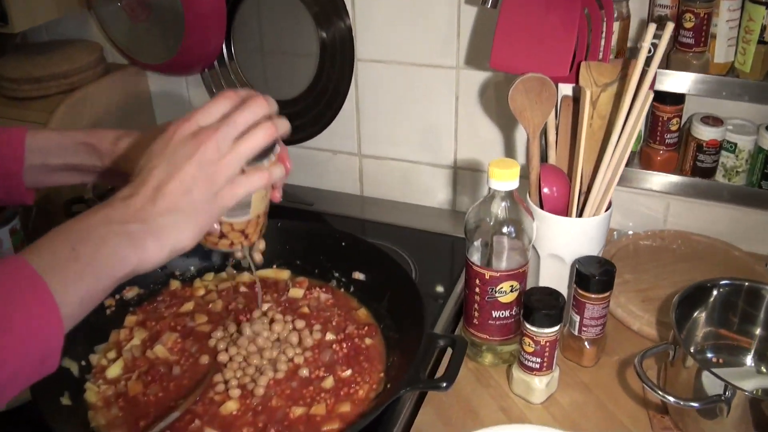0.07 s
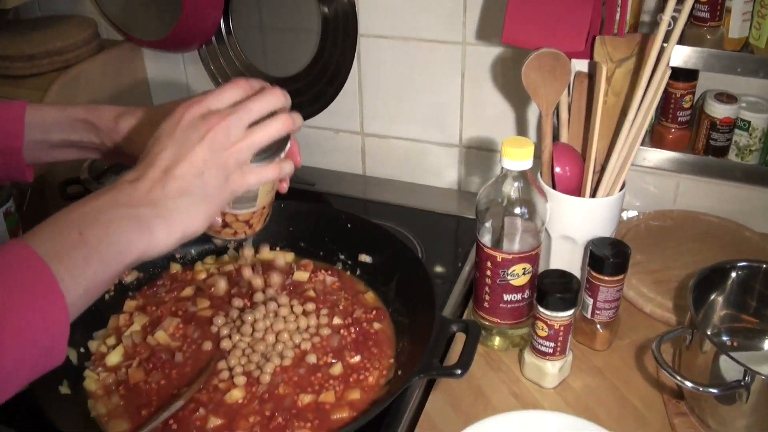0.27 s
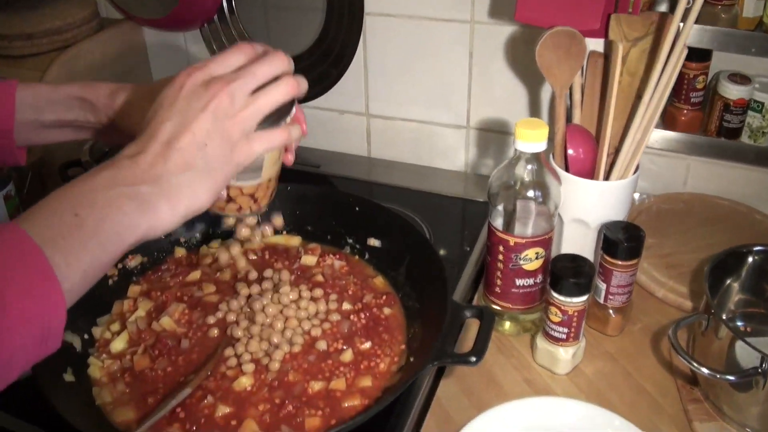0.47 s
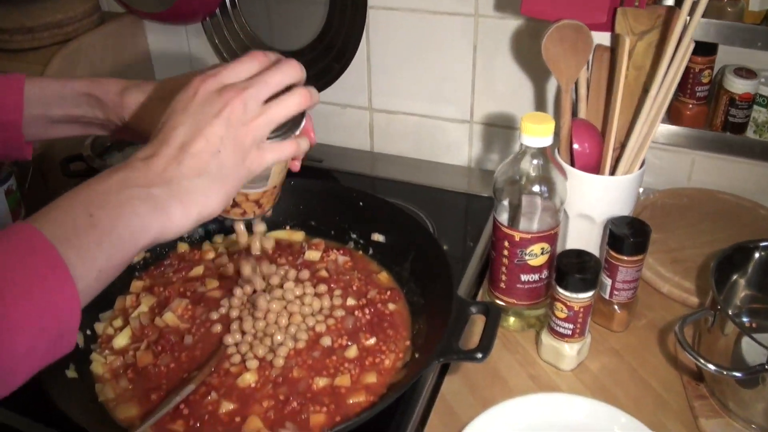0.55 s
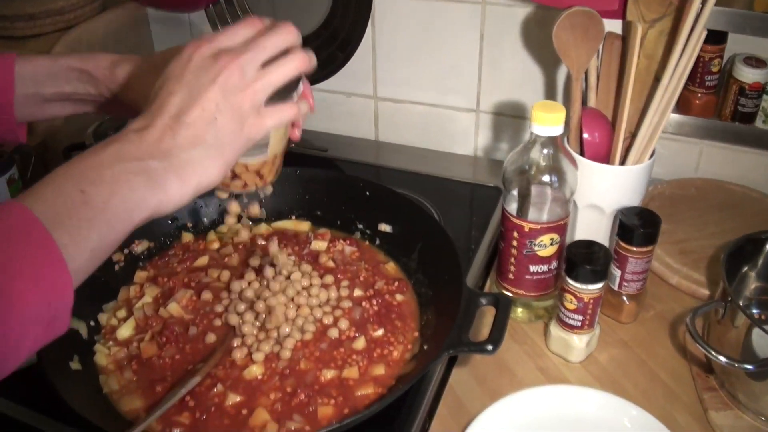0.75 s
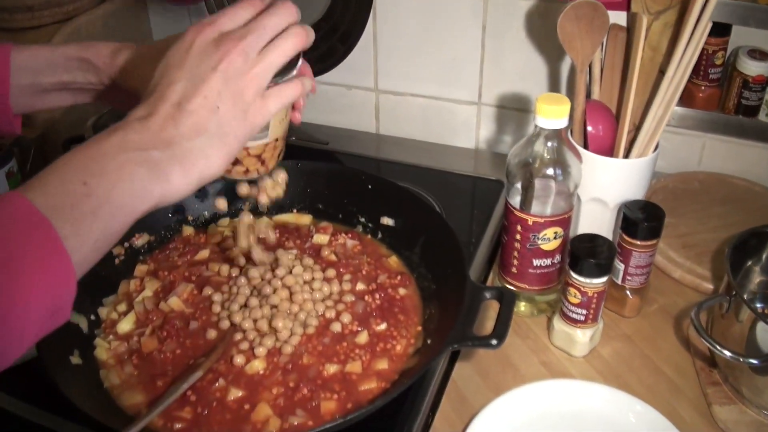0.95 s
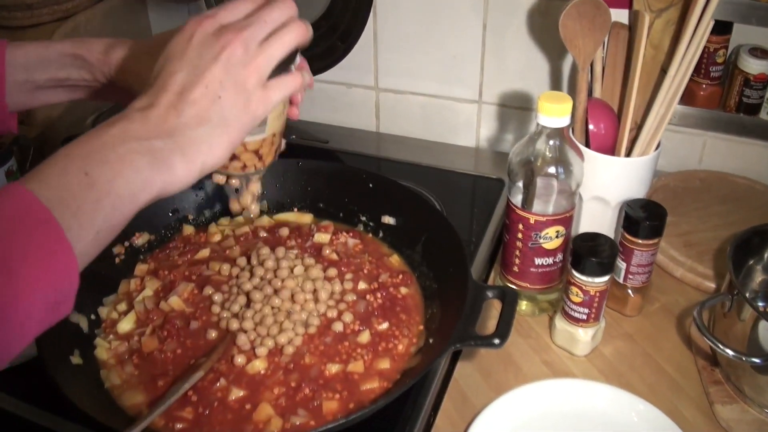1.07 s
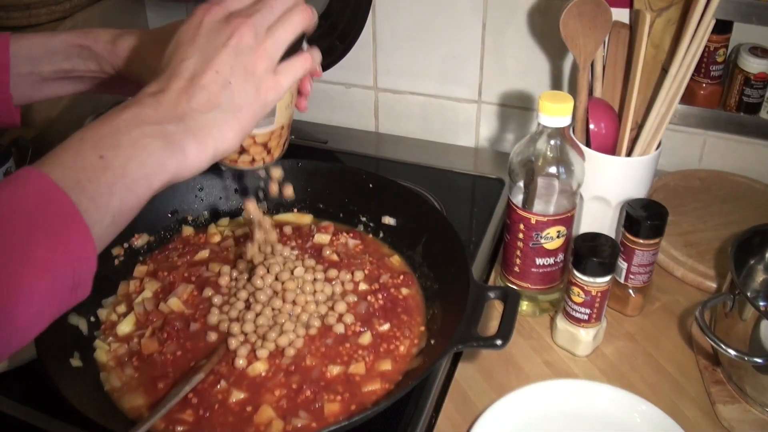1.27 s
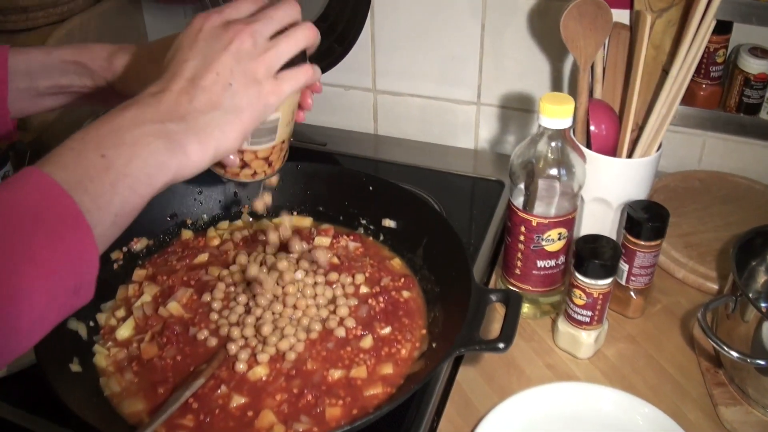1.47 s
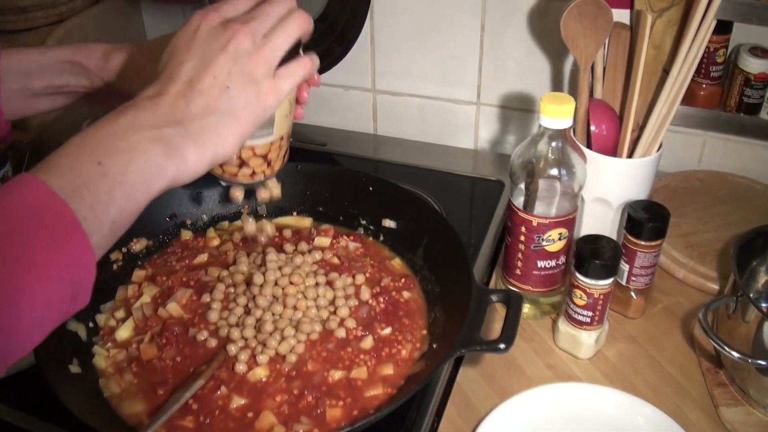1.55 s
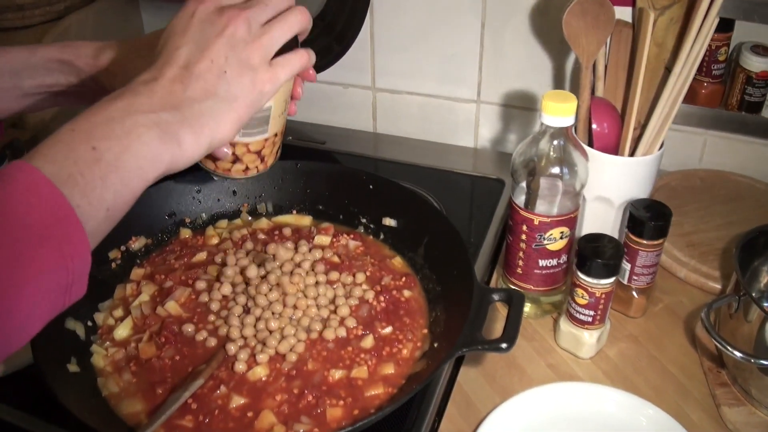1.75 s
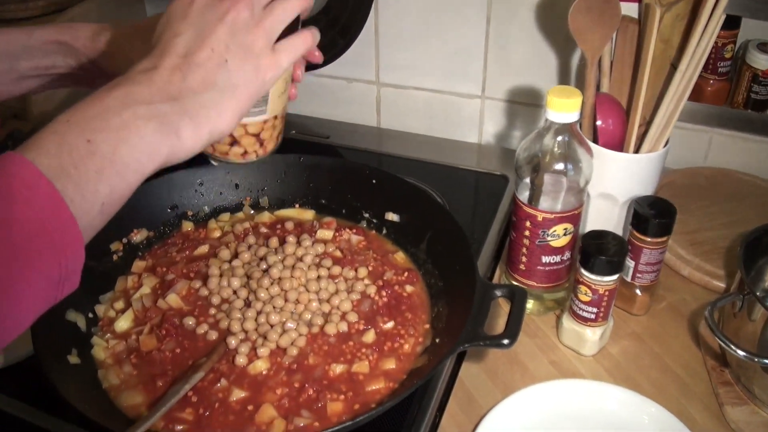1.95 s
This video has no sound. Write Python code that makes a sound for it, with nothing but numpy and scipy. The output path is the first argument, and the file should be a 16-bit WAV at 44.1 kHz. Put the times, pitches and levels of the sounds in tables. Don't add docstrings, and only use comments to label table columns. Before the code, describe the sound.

A half-full tin of wet chickpeas knocks and rattles rhythmically, growing louder, then stops in a quiet kitchen

```python
import sys
import numpy as np
from scipy import signal
from scipy.fft import rfft, irfft, next_fast_len
from scipy.io import wavfile

SR = 44100
rng = np.random.default_rng(int(sys.argv[2]) if len(sys.argv) > 2 else 0)


def store_pcm(level_fs):
    pcm = np.round(np.clip(level_fs, -1, 1) * 32767).astype(np.int16)
    wavfile.write(sys.argv[1], SR, np.atleast_2d(pcm).T)


def field_ratio(decibels):
    return 10 ** (np.asarray(decibels, dtype=float) / 20)


N = 88200

# [f/Hz, level/dB per Hz]
HUM_SPECTRUM = [(12, -31.5), (20, 5.5), (64, -1), (171, -2), (429, -3.5), (1460, -13.5), (2100, -22.5),
                (6390, -26.5), (15600, -28.5)]
# [f/Hz, level/dB per Hz]
CLOTH_SPECTRUM = [(2000, 1), (4000, -7.5), (6000, 0), (8000, -0.5), (10000, -6), (15000, -19.5)]
# [middle t/s, rms level/dB]
SLEEVE_STROKES = [(0, -51), (0.137, -50.5), (0.293, -53.5), (0.447, -52), (0.738, -56), (0.898, -55.5),
                  (1.188, -59.5), (1.333, -55), (1.628, -58), (1.761, -55.5), (1.902, -56)]
# [t/s, peak level/dB, f/Hz, length/s]
STOVE_BUMPS = [(0.046, -44, 68.5, .04), (.15, -47.5, 75.2, .015), (.31, -51, 170, 0.015),
               (.39, -46, 200, 0.027), (0.684, -46, 110, .02), (1.046, -50, 70, .03),
               (1.203, -45.5, 35.2, 0.043), (1.35, -40.5, 62.2, 0.018), (1.445, -45.5, 180, 0.058),
               (1.53, -45, 56.5, 0.047), (1.6, -46, 185.2, .03), (1.77, -52, 172, 0.063),
               (1.83, -50, 66.7, 0.037)]
# [t/s, peak level/dB, air f/Hz]
LANDINGS = [(0.053, -34.5, 540), (0.084, -32.5, 425), (0.174, -32.5, 624), (0.195, -23, 535),
            (0.219, -21.5, 413), (0.349, -20, 410), (0.366, -22, 446), (0.505, -21, 535),
            (0.514, -17.5, 445), (0.535, -13.5, 414.4), (0.555, -18, 379), (0.606, -26, 559),
            (0.661, -14, 424), (0.679, -19, 534), (0.803, -12.5, 431), (0.821, -18.5, 535),
            (0.949, -24.5, 440), (0.974, -13, 510), (0.998, -11, 408.6), (1.116, -9.5, 455),
            (1.129, -6, 519.2), (1.272, -7, 502.5), (1.299, -7.5, 539.3), (1.414, -14.5, 512),
            (1.431, -6, 462), (1.452, -6.5, 527), (1.525, -24, 520), (1.575, -11, 567), (1.591, -12, 526),
            (1.675, -14, 526)]
# [t/s, peak level/dB, air f/Hz]
FURTHER_LANDINGS = [(.035, -49, 547), (.062, -32, 580), (.07, -35.5, 400), (.108, -47, 534), (.165, -35, 460),
                    (.773, -32, 490), (.962, -21, 586), (1.003, -17.5, 513), (1.104, -22, 547),
                    (1.143, -14.5, 607), (1.2, -32, 495), (1.335, -22, 523), (1.42, -17.5, 658),
                    (1.465, -21, 494), (1.494, -19, 505), (1.54, -32, 458), (1.562, -19, 645),
                    (1.632, -21.5, 495), (1.74, -28, 550), (.205, -19.5, 479), (.232, -25, 331),
                    (.31, -35, 440), (.385, -22, 357), (.46, -33.5, 453), (.575, -31, 360), (.70, -21, 362.6),
                    (.835, -17.5, 367), (.927, -32.5, 490), (1.03, -18, 427), (1.155, -19.5, 403),
                    (1.25, -23.5, 509), (1.283, -10, 453), (1.32, -25.5, 442), (1.445, -8, 469),
                    (1.48, -34, 437), (1.605, -12, 506.4), (1.694, -13.5, 518.5), (1.712, -21.5, 478),
                    (1.773, -29, 485)]
# [f/Hz, level/dB, t60/s]
WALL_MODES = [
    (434, -17, 0.5),
    (478, -19, 0.19),
    (535, -10.5, 0.31),
    (669.3, -6.5, 0.25),
]
# [t/s, f/Hz, peak level/dB, t60/s]
BASE_RINGS = [(.065, 603.5, -38.5, 0.4), (.215, 598.5, -19.5, 0.17), (.36, 600.3, -22, 0.16),
              (.53, 604.9, -20.5, 0.22), (.67, 606.4, -32.5, 1), (.812, 599.7, -19, 0.12),
              (.965, 604.6, -20, 0.12), (1.002, 606.5, -16.5, 0.24), (1.12, 609, -23, 0.36),
              (1.14, 532.3, -30, 0.37), (1.285, 602.9, -18, 0.27), (1.29, 531.3, -17.5, 0.18),
              (1.565, 609.8, -24, 0.41), (1.77, 626, -30.5, 0.033)]
# [t/s, peak level/dB, f/Hz]
SIDE_CLANGS = [(0.035, -40.5, 905), (0.107, -36, 885), (0.2, -37, 960), (0.363, -44, 985), (0.51, -36, 942),
               (0.662, -26.5, 946), (0.805, -25.5, 965), (0.832, -34.5, 990), (0.978, -31.5, 890),
               (1.004, -18, 928), (1.034, -31.5, 930), (1.06, -31, 910), (1.123, -22, 940),
               (1.141, -26.5, 960), (1.165, -29.5, 951), (1.278, -28.5, 952), (1.304, -28, 952),
               (1.418, -25.5, 970), (1.449, -27, 964), (1.599, -31, 932), (1.721, -24.5, 952),
               (1.754, -35.5, 975)]
# [t/s, peak level/dB, patter length/s, brightness/dB per octave]
PEA_KNOCKS = [(0.037, -40.5, 0.044, -8), (0.094, -34, 0.02, -12), (0.2, -27, 0.029, 0.5),
              (0.357, -27.5, 0.035, 1), (0.512, -21, 0.032, 1.5), (0.531, -34, 0.044, 1.5),
              (0.661, -19, 0.028, 0), (0.803, -22, 0.044, -2.5), (0.827, -18, 0.014, -3),
              (0.9683, -29, 0.051, 2), (0.9992, -13.5, 0.0079, -0.5), (1.104, -33.5, 0.049, 4.5),
              (1.1245, -14, 0.022, -9.5), (1.265, -25.5, 0.05, -0.5), (1.275, -18, 0.011, -2.5),
              (1.305, -23.5, 0.0175, -6.5), (1.4146, -22.5, 0.013, -2.5), (1.424, -22, 0.023, 2),
              (1.446, -17.5, 0.021, -3.5), (1.549, -36, 0.035, 0.5), (1.5913, -27, 0.027, -1),
              (1.688, -41, 0.036, -31), (1.715, -27.5, 0.015, 0), (1.88, -43, 0.028, 2.5)]
# [f/Hz, level/dB, t60/s]
UPPER_MODES = [(684, -1, 0.061), (778, -13, 0.13), (846, -10.5, 0.085), (917, -6.5, 0.067),
               (964, -8.5, 0.2), (1076, -14, 0.12), (1234, -14, 0.13), (1305, -12.5, 0.09),
               (1430, -6.5, 0.055), (1450, -13.5, 0.14), (1858, -12.5, 0.072), (1959, -15.5, 0.11),
               (2059, -12, 0.067), (3166, -12.5, 0.02)]
# [low f/Hz, high f/Hz, level/dB]
GRIT_BANDS = [(340, 753, 6.5), (1280, 1566, -6.5), (1705, 2160, -8.5), (2040, 4130, -16.0), (4500, 9950, -24.0)]
# [t/s, f/Hz, peak level/dB, t60/s]
RIM_RINGS = [(.203, 1618, -38, .1), (.108, 1090, -45, .3), (.834, 4787, -50, .1), (1.002, 3620, -44, .22),
             (.515, 3100, -46, .12), (1.002, 5400, -49, .15), (1.257, 4060, -54, .05),
             (1.432, 3600, -47, .13), (1.443, 7580, -47, .12), (.82, 3080, -47, .15),
             (1.718, 1460, -41, .4), (1.72, 2480, -54, .3), (1.72, 1960, -44, .18), (1.49, 1458, -42, .2),
             (.663, 1960, -35, .15), (1.46, 2480, -54, .35), (.665, 1450, -33, .15), (1.44, 1440, -31, .15),
             (1.445, 2070, -36, .12), (1.275, 2070, -38, .15)]
# [t/s, peak level/dB, f/Hz]
WET_TICKS = [(0.112, -35, 9000), (0.509, -40, 2500), (1.258, -37.5, 4040), (1.7185, -46, 1790),
             (0.3025, -37, 7960), (.51, -47, 9100), (.601, -39, 13000), (.661, -37, 13700),
             (1.0912, -39, 10040), (1.1067, -40, 11100), (1.2274, -37, 12500), (1.448, -30, 9900),
             (1.557, -37, 13300), (1.637, -44, 13500)]


def impulses(times, sizes):
    x = np.full(N, 1e-18)
    np.add.at(x, (np.array(times) * SR).astype(int), sizes)
    return x


def ring(x, hz, t60):
    r, w = field_ratio(-60 / (t60 * SR)), 2 * np.pi * hz / SR
    return signal.lfilter([0, np.sin(w)], [1, -2 * r * np.cos(w), r * r], x)


def fade(x, t60):
    return signal.lfilter([1], [1, -field_ratio(-60 / (t60 * SR))], x)


def band(x, low_hz, high_hz):
    return signal.sosfilt(signal.butter(2, [low_hz, high_hz], "band", fs=SR, output="sos"), x)


def coloured(spectrum, flicker_db):
    hz, db = np.transpose(spectrum)
    f = np.arange(N // 2 + 1) * SR / N + 1
    white = rfft(rng.standard_normal(N)) * field_ratio(np.interp(np.log(f), np.log(hz), db))
    out = np.zeros(N)
    for k in range(20):
        share = np.clip(1 - abs(2 * np.log2(f / 22) - k), 0, 1)
        slow = np.interp(np.arange(N), np.linspace(0, N, 40), rng.standard_normal(40))
        out += irfft(white * share, N) * field_ratio(flicker_db * (1 - k / 24) * slow)
    return out / out.std()


def hum():
    return field_ratio(-47.5) * coloured(HUM_SPECTRUM, flicker_db=2.5)


def sleeve():
    half_s = 0.039
    t = np.arange(N) / SR
    swell = sum(field_ratio(db) * np.exp(-abs((t - s) / half_s) ** 2.6) for s, db in SLEEVE_STROKES)
    return swell * coloured(CLOTH_SPECTRUM, flicker_db=-2.5)


def bumps():
    t, out = np.arange(N) / SR, np.zeros(N)
    for s, db, hz, length in STOVE_BUMPS:
        out += field_ratio(db) * np.exp(-((t - s) / length) ** 2) * np.sin(2 * np.pi * hz * t)
    return out


def boom():
    air_rise_s, air_t60_s, base_rise_s = 0.0045, 0.038, 0.0081
    air_sag = 0.92
    air, base, t = np.zeros(N + SR), np.zeros(N + SR), np.arange(SR // 2) / SR
    shape = (1 - np.exp(-t / air_rise_s)) ** 3 * field_ratio(-60 * t / air_t60_s)
    for s, db, hz in list(LANDINGS) + list(FURTHER_LANDINGS):
        i = int((s - air_rise_s) * SR)
        tone = np.sin(2 * np.pi * hz * (t - air_sag * t * t))
        air[i:i + len(t)] += field_ratio(db) * shape / shape.max() * tone
    for s, hz, db, t60 in BASE_RINGS:
        i = int(s * SR)
        swell = (1 - np.exp(-t / base_rise_s)) ** 2 * field_ratio(-60 * t / t60)
        base[i:i + len(t)] += field_ratio(db) * swell / swell.max() * np.sin(2 * np.pi * hz * t)
    wall = np.zeros(N + SR)
    for k, (hz, db, t60) in enumerate(WALL_MODES):
        wall += (-1) ** k * field_ratio(db) * ring(air, hz, t60)
    waver_db = np.interp(np.arange(N + SR), np.linspace(0, N + SR, 210), rng.normal(0, 3, 210))
    return (air + 0.0053 * wall * field_ratio(waver_db) + base * field_ratio(waver_db / 2))[:N]


def clangs():
    rise_s, t60_s = 0.00301, 0.047
    out, t = np.zeros(N + SR), np.arange(SR // 4) / SR
    shape = (1 - np.exp(-t / rise_s)) * field_ratio(-60 * t / t60_s)
    for s, db, hz in SIDE_CLANGS:
        i = int((s - rise_s) * SR)
        out[i:i + len(t)] += field_ratio(db - 2) * shape / shape.max() * np.sin(2 * np.pi * hz * t)
    return out[:N]


def patter():
    peas_per_s, rise_s = 500, 0.004
    first_db, shower_db, grit_db = -2, -3.5, -7.5
    times, peak_db, length, bright = np.transpose(PEA_KNOCKS)
    t, out = np.arange(N) / SR, np.zeros(N)
    uneven_db = rng.normal(0, 2.5, (len(times), len(UPPER_MODES)))
    age = np.maximum(t - times[:, None], 0)
    shower = (1 - np.exp(-age / rise_s)) * np.exp(-age / length[:, None])
    trickle = field_ratio(-60 + 8.4 * (t - 2)) / (1 + np.exp((t - 1.78) / 0.044))
    for k, (hz, db, t60) in enumerate(UPPER_MODES):
        size = field_ratio(peak_db + db - 11 + bright * np.log2(hz / 1000) + uneven_db[:, k])
        peas = (rng.random(N) < peas_per_s / SR) * rng.standard_normal(N)
        first = impulses(times, field_ratio(first_db) * size)
        others = peas * (field_ratio(shower_db) * (size @ shower) + field_ratio(db) * trickle)
        out += ring(first + others, hz, t60)
    for low_hz, high_hz, db in GRIT_BANDS:
        size = field_ratio(peak_db + grit_db + db + bright * np.log2(max(low_hz / 700, 1)))
        grains = rng.exponential(1, N) * (rng.random(N) < 500 / SR)
        grit = rng.standard_normal(N) * (1 + fade(grains, 0.02))
        out += band(grit * (size @ shower), low_hz, high_hz)
    return out


def rim():
    out = np.zeros(N)
    for s, hz, db, t60 in RIM_RINGS:
        touches = rng.standard_normal(N) * fade(impulses([s], 1), 0.05)
        tone = ring(touches, hz, t60)
        out += field_ratio(db) * tone / abs(tone).max()
    return out


def ticks():
    click_t60_s, spray_t60_s, spray_db = 0.011, 0.23, -11.5
    out, noise = np.zeros(N), rng.standard_normal(N)
    for s, db, hz in WET_TICKS:
        click = impulses([s], field_ratio(db - 5.5))
        burst = noise * (fade(click, click_t60_s) + field_ratio(spray_db) * fade(click, spray_t60_s))
        out += band(burst, 0.63 * hz, min(1.46 * hz, SR / 2.5))
    return out


def reverberation(x):
    t60_s, wall_cut_hz = 0.31, 24000
    size = next_fast_len(N + SR)
    f = np.arange(size // 2 + 1) * SR / size
    response = 0
    for k, lag in enumerate(rng.uniform(0.011, 0.035, 10)):
        loss = field_ratio(-60 * lag / t60_s) / (1 + 1j * f / wall_cut_hz)
        turn = loss * np.exp(-2j * np.pi * f * lag)
        response = response + (-1) ** k * turn / (1 - turn)
    return irfft(rfft(x, size) * response, size)[:N]


def scene():
    mouth = signal.butter(6, 309, "high", fs=SR, output="sos")
    tin = signal.sosfilt(mouth, boom() + clangs() + patter() + rim() + ticks())
    mix = tin + field_ratio(-20) * reverberation(tin) + sleeve() + bumps() + hum()
    return mix[None]


def roll_off(x):
    return signal.sosfilt(signal.butter(12, 15740, fs=SR, output="sos"), x)


def record(dry):
    return roll_off(dry)


dry = scene()
out = record(dry)
store_pcm(out)
```